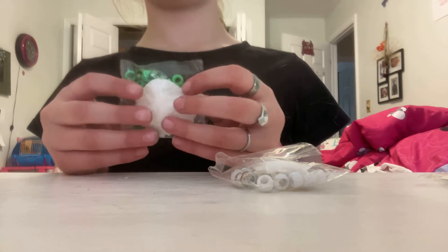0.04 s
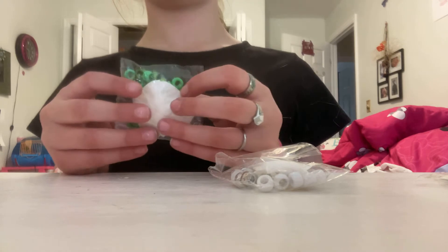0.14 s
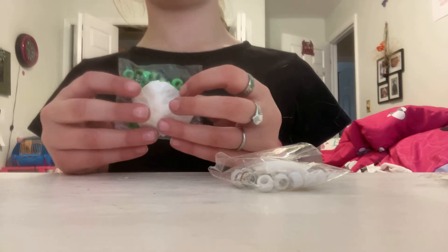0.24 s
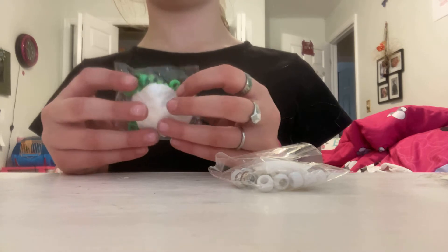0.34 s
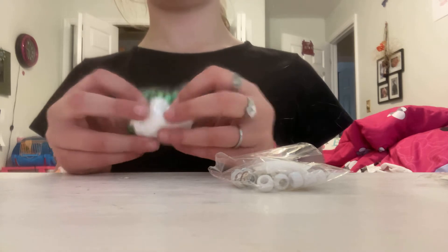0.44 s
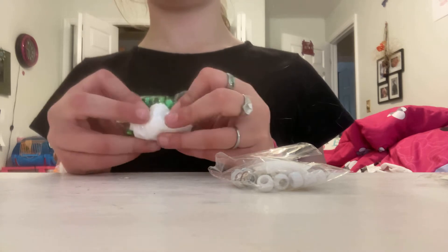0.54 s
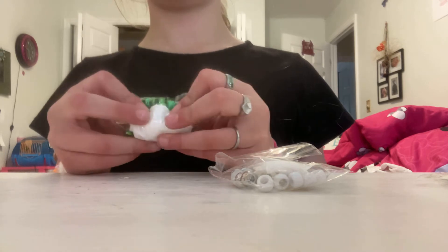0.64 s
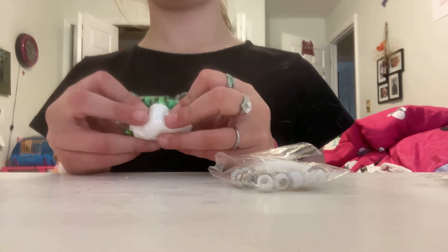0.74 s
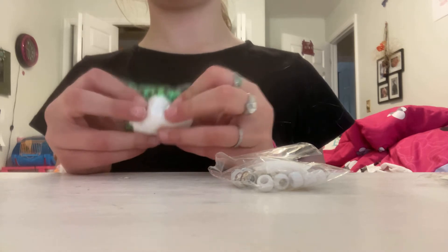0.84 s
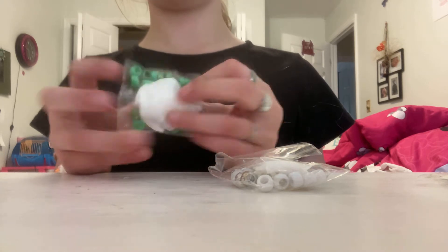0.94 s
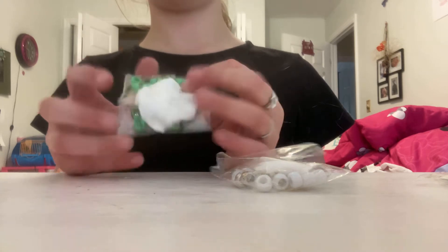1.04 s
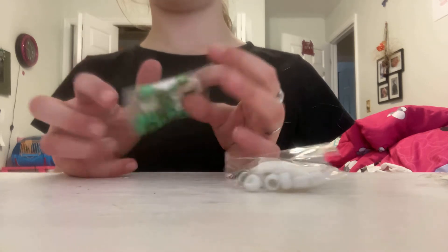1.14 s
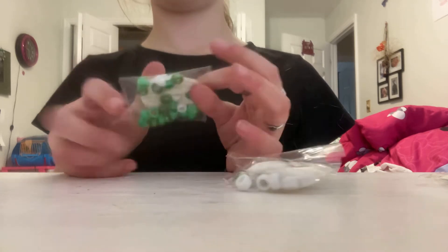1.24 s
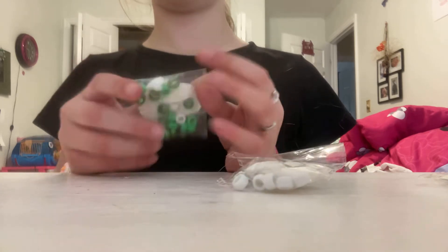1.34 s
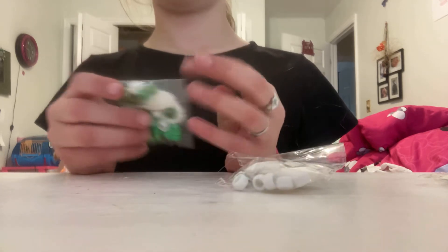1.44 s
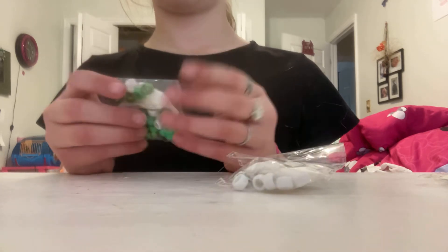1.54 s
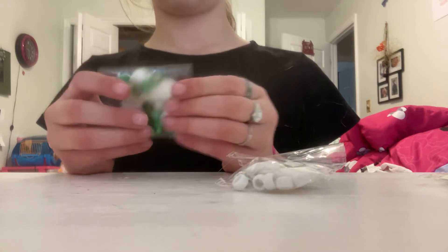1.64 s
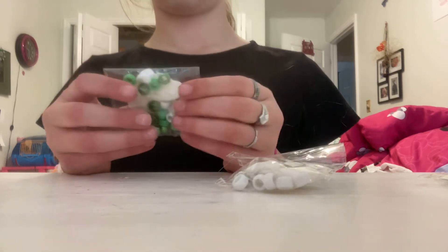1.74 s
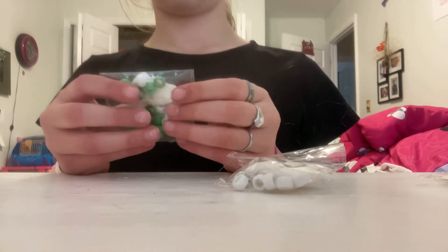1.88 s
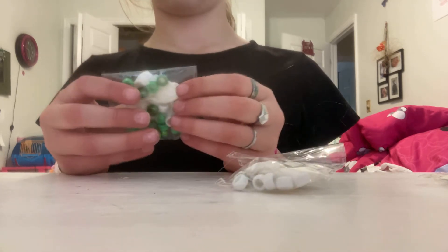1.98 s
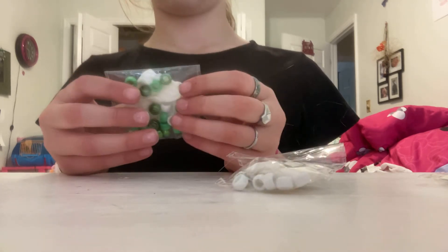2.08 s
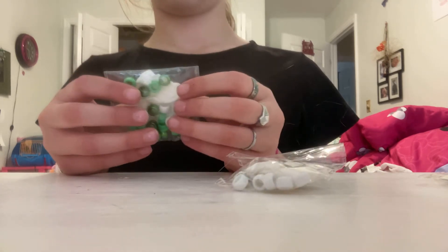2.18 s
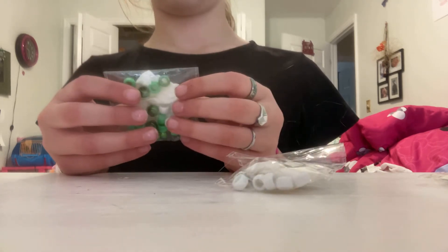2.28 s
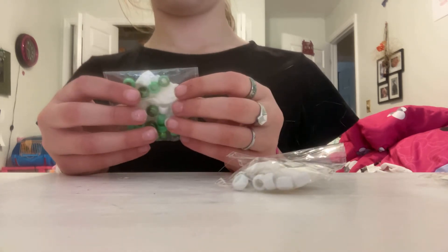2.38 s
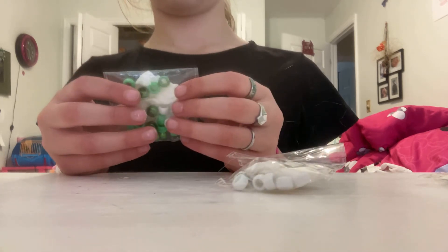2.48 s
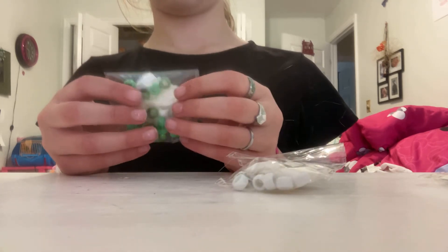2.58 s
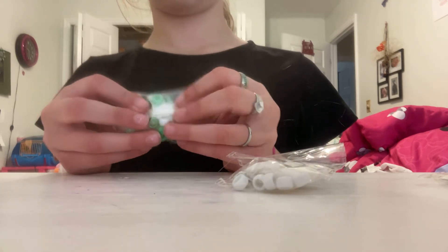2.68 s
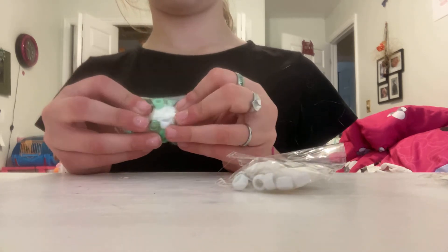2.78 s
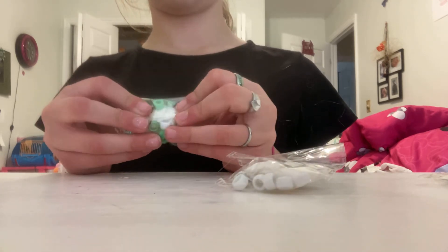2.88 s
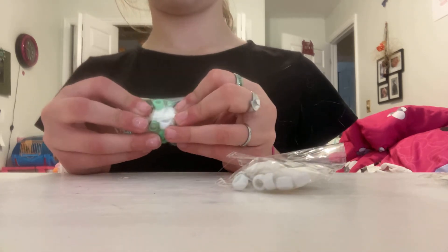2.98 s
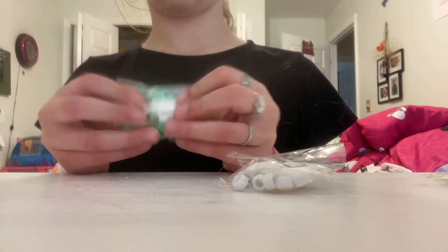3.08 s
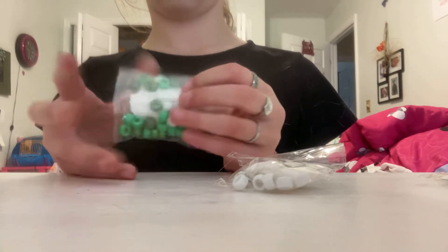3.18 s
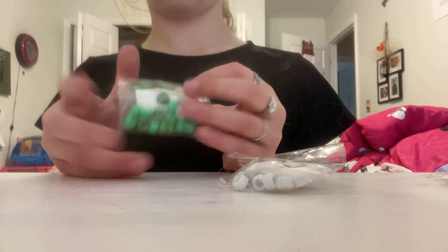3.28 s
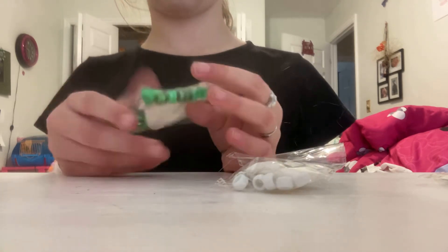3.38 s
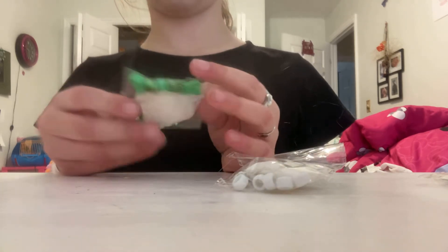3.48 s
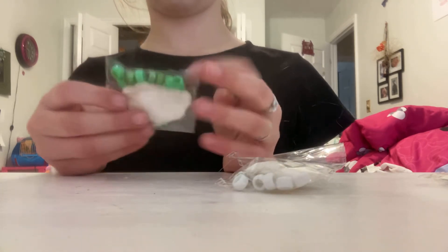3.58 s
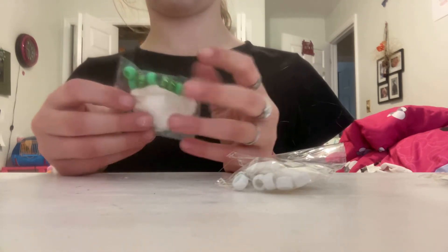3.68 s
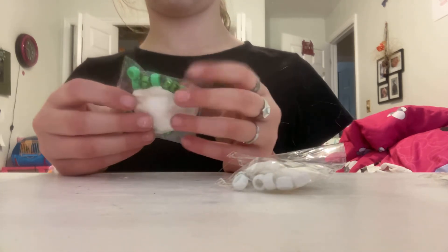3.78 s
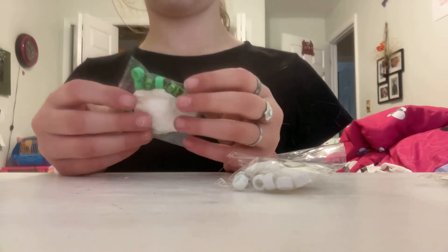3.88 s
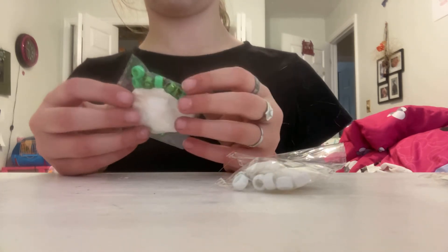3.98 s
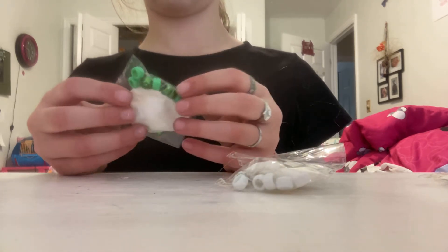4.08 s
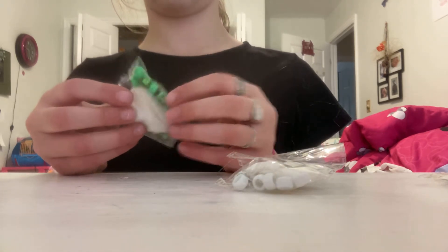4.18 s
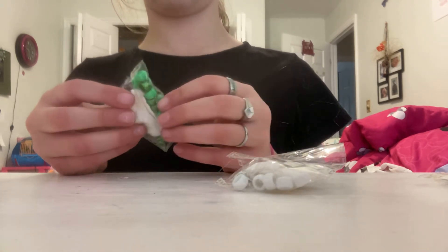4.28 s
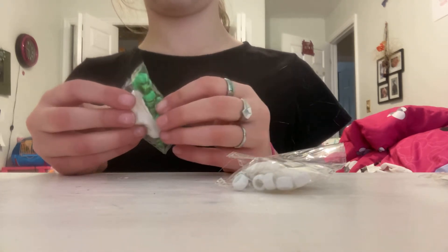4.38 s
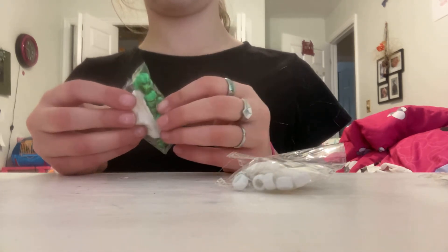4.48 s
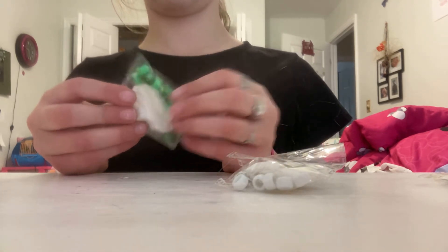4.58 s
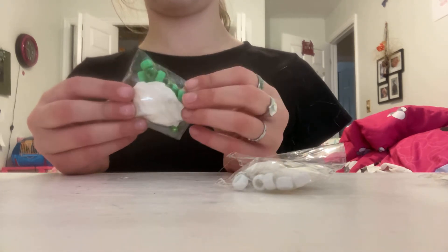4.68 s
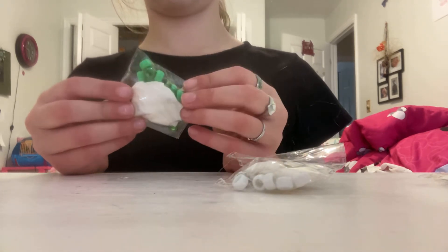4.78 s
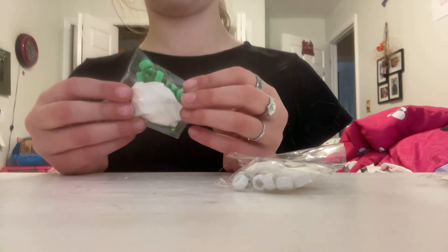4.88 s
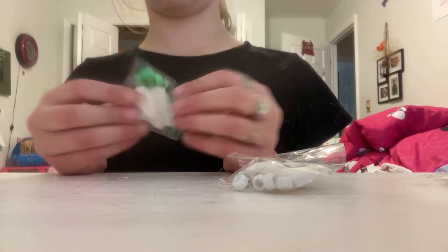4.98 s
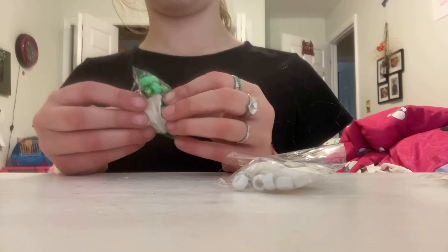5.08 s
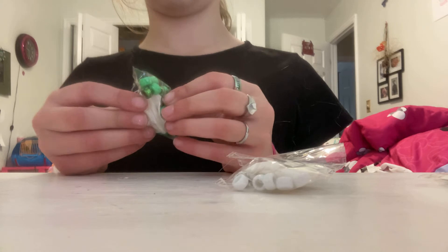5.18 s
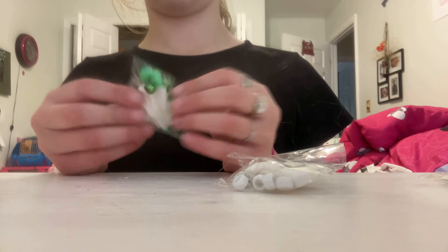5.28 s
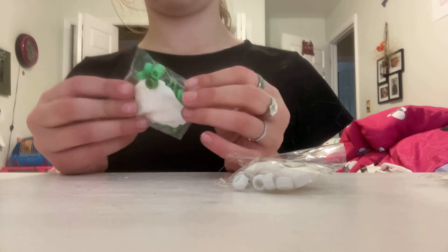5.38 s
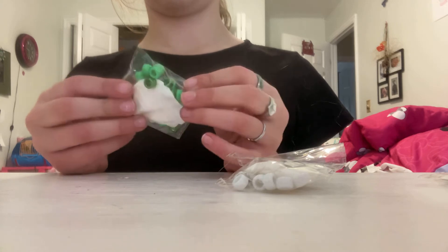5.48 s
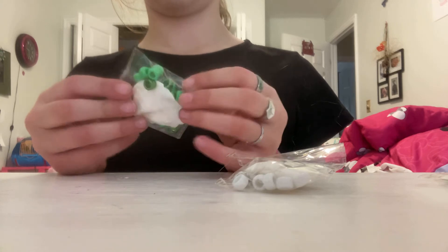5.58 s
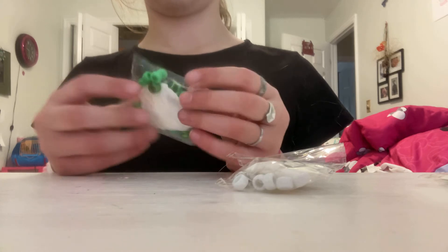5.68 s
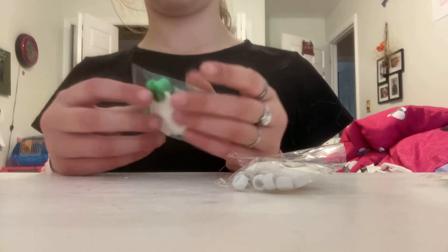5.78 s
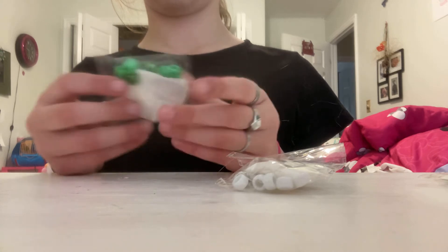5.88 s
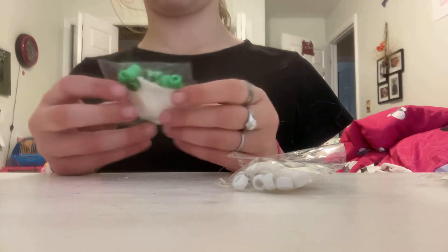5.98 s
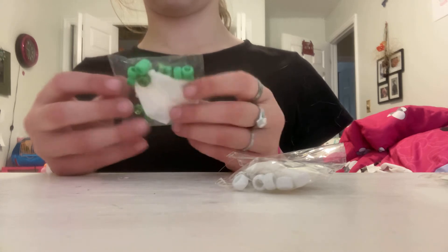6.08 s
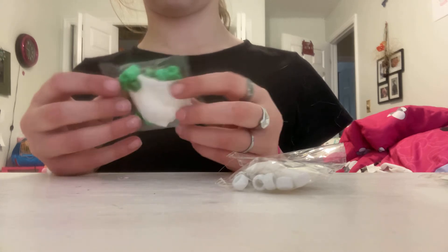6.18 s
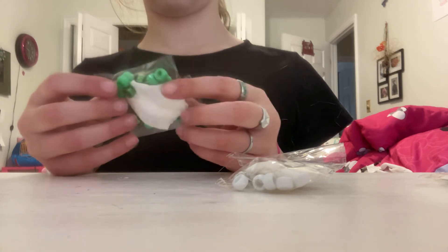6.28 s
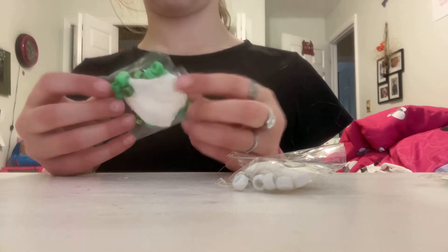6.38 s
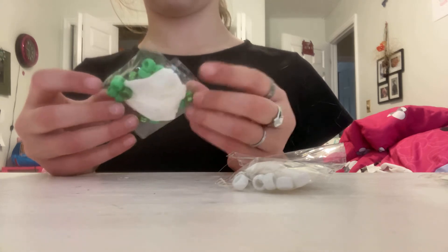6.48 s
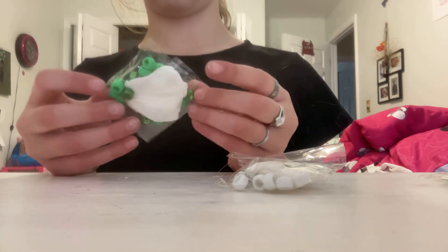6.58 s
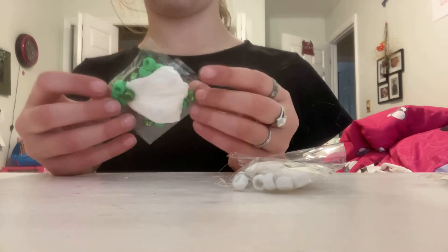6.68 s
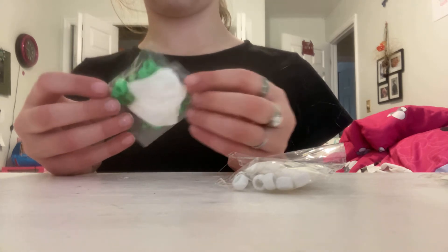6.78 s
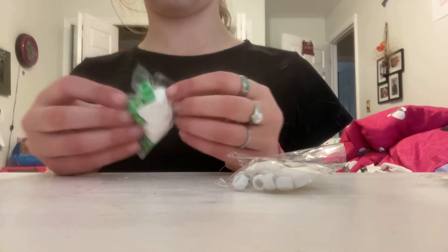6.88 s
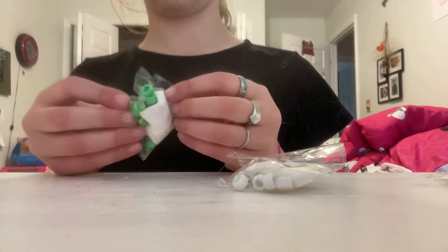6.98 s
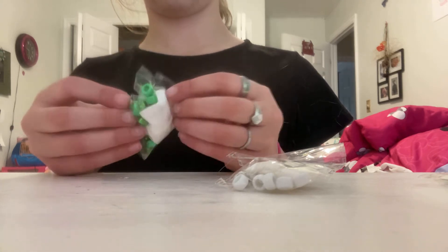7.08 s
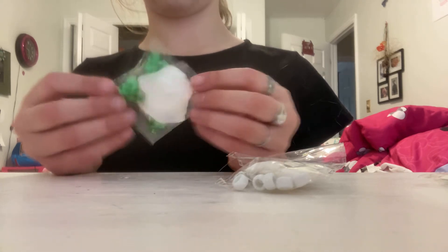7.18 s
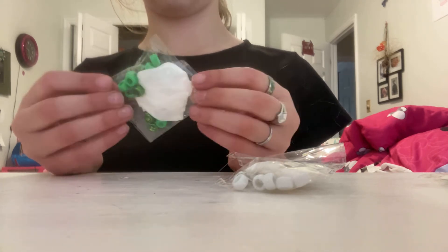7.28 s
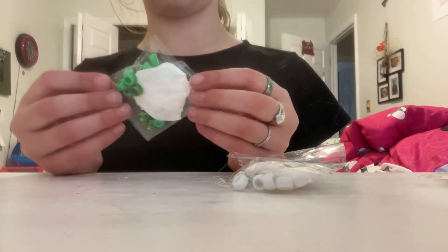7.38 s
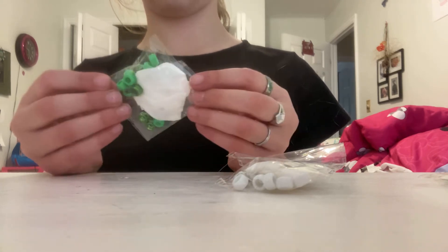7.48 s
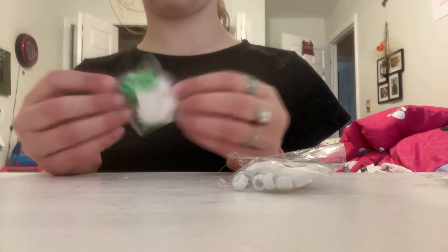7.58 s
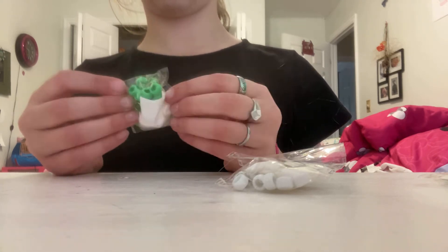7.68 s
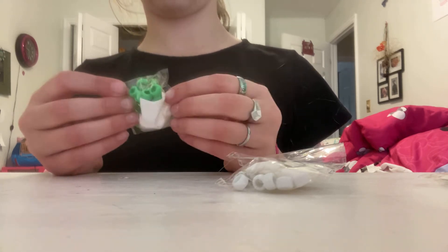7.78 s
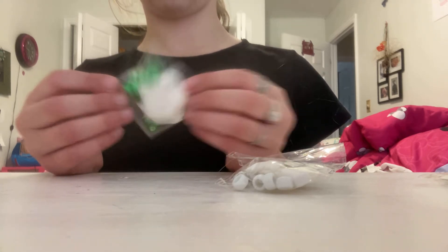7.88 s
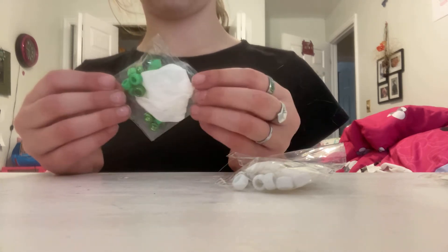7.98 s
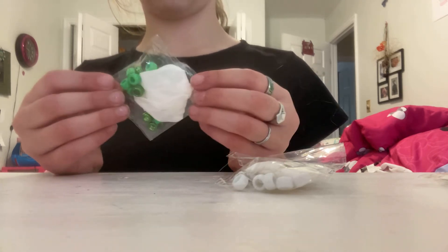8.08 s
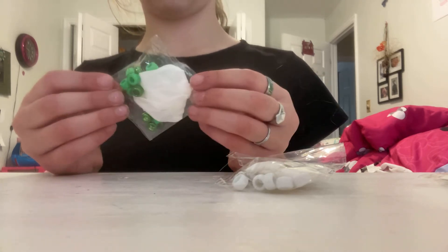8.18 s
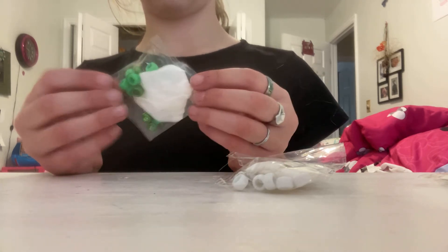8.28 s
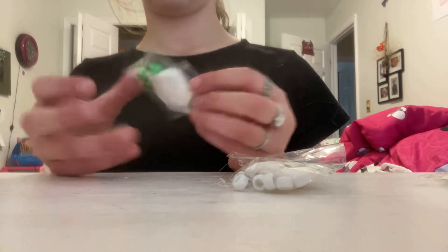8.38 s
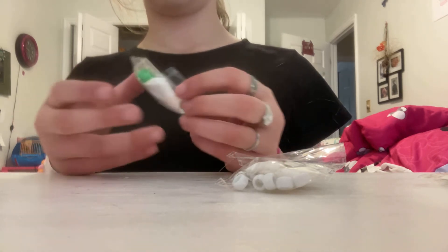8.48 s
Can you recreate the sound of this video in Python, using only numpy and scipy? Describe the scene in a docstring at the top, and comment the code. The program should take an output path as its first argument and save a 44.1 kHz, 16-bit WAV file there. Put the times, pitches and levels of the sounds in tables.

```python
"""A small plastic bag of beads and paper, squeezed and folded by two hands, close up at a table.
Each squeeze or change of grip builds up, holds and lets go; its strain drives a crackle of creases
and a soft rubbing. Large creases buckle in single snaps, the packed bag adds a hollow body, and
fingertips land with a few dull bumps. The table and a small furnished room answer faintly over a
low hum."""
import sys
import numpy as np
from scipy import signal
from scipy.fft import rfft, irfft
from scipy.io import wavfile
from scipy.ndimage import uniform_filter1d

SR = 44100
rng = np.random.default_rng(int(sys.argv[2]) if len(sys.argv) > 2 else 0)


def log_audio(samples):
    """Write samples as a 16-bit WAV file to the path given in sys.argv[1]."""
    # one column per channel
    frames = np.atleast_2d(samples).T
    # limit to full scale, then quantise
    limited = np.clip(frames, -1, 1)
    pcm = np.round(limited * 32767).astype(np.int16)
    wavfile.write(sys.argv[1], SR, pcm)


N = 376658

# hollow colour of the packed bag: f/Hz, level/dB
BODY_COLOUR = [(100, -29), (260, -18), (400, -16), (560, -5), (680, -6.5), (790, -5.5), (890, 0.5),
               (1060, -3.5), (1400, -5), (1800, -14), (2500, -19.5), (5000, -54)]
# bright colour of the ringing film: f/Hz, level/dB
FILM_COLOUR = [(400, -71), (1500, -9), (2350, -8.5), (2750, -2), (3700, 0), (5300, 0), (6500, -1),
               (8000, -18), (12000, -6)]
TAPS = 512  # samples in one snap
SNAP_TIME, SNAP_HZ = np.arange(TAPS) / SR, np.fft.rfftfreq(TAPS, 1 / SR)
TIME = np.arange(N) / SR


def snaps(body_db=-0.1, ring_db=1.76, edge_db=0.4, facet_hz=3746, hollow_db_per_octave=65.5):
    """Large creases buckle one at a time; a broad facet rings lower and pushes more air."""
    # t/s, level/dB over 1 ms, hollow body/dB, crisp edge/dB (both relative to level; all before trims)
    large_creases = [(0.0367, -52, -27, 17.5), (0.0616, -19, -10.5, -9), (0.0834, -27.5, -9, -9),
                     (0.1017, -40.5, 9, -7), (0.128, -36, -14, -4), (0.3758, -16, -7.5, -22),
                     (0.4597, -15.5, -32, -8), (0.5982, -26, -39, 3), (0.7061, -39.5, -12, 4),
                     (0.788, -31, -60, -5), (0.821, -21, -7, -23), (0.8541, -26, -19, 8.5),
                     (0.872, -29, -24, 7), (0.998, -18, -7, -4), (1.0523, -23, -14, 4),
                     (1.1997, -30, -23, -9), (1.289, -25.5, -37, -6), (1.3107, -25.5, -5, -6),
                     (1.389, -18.5, -36, -21), (1.4087, -19.5, -14, -1.5), (1.4408, -21, -13, -10),
                     (1.4718, -24.5, -21, 4), (1.4961, -21, -34, -6), (1.5513, -26.5, -5.5, -18),
                     (1.6881, -33, 4.5, -1), (1.72, -31.5, -2, -17), (1.7704, -30, -4, -14),
                     (1.979, -22, -10, -7), (1.9853, -21.5, -24, -3), (2.1, -39, -1, 7.5),
                     (2.163, -42.5, -13, -11), (2.289, -37, -3.5, -6), (2.54, -25, 2, 1),
                     (2.5586, -23, -5, -3), (2.5938, -23, -0.5, 5), (2.639, -23, -22, 1),
                     (2.6451, -18, -2.5, 5), (2.6824, -22, -11, 6), (2.703, -19.5, -12, -18),
                     (2.86, -31, -31, -9), (2.8767, -28.5, -13, -1), (2.922, -31.5, -50, 6.5),
                     (3.046, -25, -15, 3), (3.069, -24.5, -3, 11), (3.0851, -20, 3.5, 6),
                     (3.0956, -13, -4, -6), (3.1768, -26.5, -32, -4), (3.348, -22.5, -14, -4.5),
                     (3.4102, -29.5, -8, -2), (3.5254, -25, -10, -14), (3.548, -24.5, -32, -6),
                     (3.722, -28.5, -9, -8), (3.7346, -25.5, -0.5, -4.5), (3.878, -30.5, -18, -20.5),
                     (3.9593, -37, -5, 7.5), (4.0451, -26.5, -11, -5), (4.1087, -19.5, -7, 5),
                     (4.1669, -12.5, 0, -1.5), (4.2546, -18, -5.5, -7), (4.2664, -20.5, -10, -7),
                     (4.2735, -31, -6, 12.5), (4.3174, -23.5, -9, -0.5), (4.6051, -16, -6, -1),
                     (4.6288, -19, 3.5, 4), (4.7068, -15, -31, -8.5), (4.9547, -12, -18, -6),
                     (4.9788, -14, 0.5, -7), (4.9946, -10.5, -16, 0), (5.0911, -24.5, -25, -7.5),
                     (5.238, -40.5, -10, 4), (5.2758, -32, -11, 3), (5.383, -16, -5.5, -10),
                     (5.4954, -28.5, -1.5, -11), (5.658, -18.5, -18, -6), (5.7013, -19, -11, -5),
                     (5.7433, -25, 6, 5.5), (5.804, -26, -14, 2), (5.8184, -23, -29, -3),
                     (5.863, -17.5, -13, -11), (5.972, -27, -10, -0.5), (6.045, -24, -7, -16),
                     (6.1938, -18, -10, 1), (6.2305, -22, -16, -12), (6.2573, -25, -16, -9),
                     (6.3074, -22.5, -11, -11), (6.321, -14.5, -14.5, -18), (6.345, -22.5, -7, -12),
                     (6.4364, -23, -10, -0.5), (6.4482, -20.5, -8, -10), (6.4766, -24, -6, -5),
                     (6.5412, -28, -19, -4), (6.575, -28, -3, -27), (6.6072, -29, -3.5, -13),
                     (6.6706, -25.5, -5, -11), (6.7269, -28, -13, 0.5), (6.8188, -13, -8.5, -2.5),
                     (6.889, -12.5, -33, -10), (6.9086, -19.5, -18, -4), (6.9782, -32, -11, 2),
                     (7.1044, -16.5, -12.5, -6), (7.1367, -15.5, -11, -1), (7.1841, -9, -7.5, -26),
                     (7.2659, -21.5, -5, -10), (7.317, -23.5, 0.5, -2), (7.3407, -16, -3, -11),
                     (7.4184, -37.5, -4, 6), (7.5819, -11.5, -9.5, -28), (7.608, -14, -18, -12),
                     (7.6245, -14, -9.5, -3), (7.7582, -30.5, -22.5, -1.5), (7.8511, -14.5, -32, -3),
                     (7.9, -11, -1.5, -7), (7.9378, -17.5, -4, -4.5), (8.1542, -34.5, -8.5, -22),
                     (8.2839, -24.5, 0, -7), (8.2946, -19, -1.5, -3.5), (8.331, -27, -6, -10),
                     (8.4348, -24.5, -1.5, -0.5)]
    times, level, hollow, crisp = np.transpose(large_creases)
    ring_hz = facet_hz * 2 ** (-hollow / hollow_db_per_octave)
    body, ring, edge = creases(ring_hz, width_hz=1410, tilt_db=3.5)
    sounds = amp(hollow + body_db)[:, None] * body + amp(ring_db) * ring
    sounds += amp(crisp + edge_db)[:, None] * edge
    sounds *= amp(level)[:, None] * np.sqrt(SR / 1000)
    out = np.zeros(N)
    for s, sound in zip(times, sounds):
        add(out, s, sound)
    return out


def crackle(full_per_s=2300, full_db=-23.5, db_per_decade=23.0, size_spread_db=9.5,
            body_db=-5, edge_db=-5, edge_follow=0.15, colour_spread_db=3.5, variants=96):
    """Small creases: the harder the squeeze, the more of them flip and the larger and crisper they are."""
    strain_db, hollow_db = hand_strain()
    flips_per_s = full_per_s * 10 ** (np.minimum(strain_db - full_db, 0) / db_per_decade)
    at = np.flatnonzero(rng.random(N) < flips_per_s / SR)
    size_draw, body_draw, edge_draw = rng.standard_normal((N, 3))[at].T
    size = amp(size_spread_db * np.minimum(size_draw, 2))
    # neighbouring creases share the strain that the fingers put in
    energy = np.zeros(N)
    energy[at] = size ** 2
    expected_energy = np.mean(size ** 2) * flips_per_s / SR
    shared_energy = .9 * uniform_filter1d(energy, size=1000) + .1 * expected_energy
    size *= amp(strain_db[at]) / np.sqrt(shared_energy[at])
    size *= rng.choice([-1, 1], N)[at]  # a crease flips inwards or outwards
    body, ring, edge = creases(ring_hz=4350 * np.exp(0.19 * rng.standard_normal(variants)))
    kind = rng.integers(0, variants, N)[at]
    body_gain = amp(hollow_db[at] + body_db + colour_spread_db * body_draw)
    edge_gain = amp(edge_db + edge_follow * (strain_db[at] - full_db) + colour_spread_db * edge_draw)
    sounds = ring[kind] + body_gain[:, None] * body[kind] + edge_gain[:, None] * edge[kind]
    out = np.zeros(N)
    for index, sound in zip(at, size[:, None] * sounds):
        add(out, index / SR, sound)
    return out


def creases(ring_hz, width_hz=1500, tilt_db=4.0, body_spread=0.073):
    """Body, ring and edge of one crease per pitch; each facet has its own resonance and sharpness."""
    # colour of a snap's sharp edge: f/Hz, level/dB
    edge_colour = [(700, -40), (2000, -33), (5500, -3), (7400, 3), (11400, 0), (15500, 0.8), (18400, -76)]
    count = len(ring_hz)
    tilt_draw, pocket_draw = rng.standard_normal((2, count, 1))
    facet_db = -10 * np.log10(1 + (2 * (SNAP_HZ - ring_hz[:, None]) / width_hz) ** 2)
    slope_db = tilt_db * tilt_draw * np.log2(1 + SNAP_HZ / ring_hz[:, None])
    pocket_size = np.exp(body_spread * pocket_draw)  # the air pocket changes with the grip
    body = buckle(curve(BODY_COLOUR, SNAP_HZ * pocket_size), count, flutter=1.35, flutter_s=.0018)
    ring = buckle(curve(FILM_COLOUR, SNAP_HZ) + facet_db, count, flutter=1.5, flutter_s=.0008)
    edge = buckle(curve(edge_colour, SNAP_HZ) + slope_db, count, flutter=1.2, flutter_s=.0007)
    return body, ring, edge


def buckle(colour_db, count, flutter, flutter_s):
    """Creases flip: one kick each, then a short random flutter of the sheet."""
    kick = flutter * unit(rng.standard_normal((count, TAPS)) * np.exp(-SNAP_TIME / flutter_s))
    kick[:, 0] += 1
    return unit(irfft(rfft(kick) * pulse_spectrum(colour_db)))


def hand_strain(squeeze_release_s=0.088, grip_attack_s=0.051, grip_release_s=0.072,
                rest_db=-66.5, rest_hollow_db=6.5):
    """Squeezes and grips add up to the strain on the film and set how hollow it sounds, both in dB."""
    # the hands bear down: t/s at full force, attack/s, hold/s, level/dB, hollowness/dB
    squeezes = [(0.355, 0.019, 0.097, -27, -2), (0.857, .11, 0.033, -29.5, -2),
                (2.591, 0.046, 0.042, -26.5, -6.5), (3.081, 0.088, .01, -25.5, -3.5),
                (4.167, 0.2, 0.012, -27, 0), (4.602, 0.11, 0.027, -23, -2),
                (4.957, 0.078, 0.037, -25.5, -1), (5.313, .075, 0.014, -20.5, 0),
                (6.776, 0.045, .1, -27, -3), (7.162, 0.074, 0.028, -24.5, -1),
                (7.539, 0.051, 0.042, -25.5, 0), (7.898, 0.15, 0.011, -26, -1.5)]
    # the fingers shift and turn the bag: t/s at full force, hold/s, level/dB, hollowness/dB
    grips = [(0.085, .04, -47, -1), (0.212, 0.011, -50, 5.5), (0.486, 0.057, -41, -12.5),
             (0.586, 0.037, -46, -4.5), (0.948, 0.026, -31, -5.5), (1.082, 0.062, -37, -5),
             (1.215, 0.084, -40.5, 1), (1.369, 0.025, -32, -1), (1.448, 0.042, -42, 3),
             (1.532, 0.14, -51.5, 2.5), (1.784, 0.026, -52, 5.5), (1.947, 0.04, -38, -2.5),
             (2.131, 0.036, -57, 5), (2.474, 0.027, -53, 4), (2.724, 0.048, -36.5, -11),
             (2.902, 0.023, -52, 2), (3.153, 0.11, -44, 0), (3.337, 0.018, -30.5, -1),
             (3.396, 0.026, -43.5, 2), (3.474, 0.15, -41, 3), (3.754, 0.046, -50, 2),
             (4.068, 0.022, -34, -6.5), (4.269, 0.034, -35.5, -11), (4.339, 0.051, -41.5, -11),
             (4.525, .015, -33, -6.5), (4.665, 0.036, -42, 3), (5.587, .11, -33.5, 0.5),
             (5.727, 0.16, -44, 2.5), (5.965, 0.068, -42, 3), (6.104, 0.0073, -29, 1),
             (6.153, 0.205, -48.5, 5), (6.377, 0.24, -48, 1.5), (6.706, 0.015, -44, -3.5),
             (6.936, .06, -47.5, 4), (7.213, 0.044, -33, 1.5), (7.344, 0.004, -35, -3),
             (7.616, 0.03, -36.5, -2), (7.98, 0.035, -43.5, 6), (8.285, 0.071, -37, -1.5),
             (8.369, 0.09, -43, 3), (8.516, .01, -53.5, 4)]
    moves = [(s, attack, hold, squeeze_release_s, db, hollow) for s, attack, hold, db, hollow in squeezes]
    moves += [(s, grip_attack_s, hold, grip_release_s, db, hollow) for s, hold, db, hollow in grips]
    strain = amp(rest_db) ** 2  # the bag merely held
    weighted_hollow = strain * rest_hollow_db
    for *shape, hollow in moves:
        power = stroke(*shape)
        strain += power
        weighted_hollow += hollow * power
    return 10 * np.log10(strain), weighted_hollow / strain


def stroke(s, attack_s, hold_s, release_s, db, range_db=30):
    """Power of one hand movement: it swells by range_db over the attack, holds and lets go."""
    away = np.maximum(s - TIME, 0) / attack_s + np.maximum(TIME - s - hold_s, 0) / release_s
    return amp(db - range_db * np.minimum(away, 4)) ** 2


def rubbing(body_db=-59, film_db=-56, body_follow=0.77, film_follow=0.78, hollow_share=0.86,
            grain_db=11.0, slips_per_s=2500, light_touch_db=-42):
    """Paper and fingers slide on the film: tiny dense slips sound body and film, louder with pressure."""
    strain_db, hollow_db = hand_strain()
    press_db = strain_db - light_touch_db
    layers = [(BODY_COLOUR, body_db + body_follow * press_db + hollow_share * hollow_db),
              (FILM_COLOUR, film_db + film_follow * press_db)]
    out = np.zeros(N)
    for colour, db in layers:
        slips = (rng.random(N) < slips_per_s / SR) * rng.choice([-1, 1], N)
        sizes = amp(grain_db * np.minimum(rng.standard_normal(N), 2.5))
        friction = unit(slips * sizes) * np.sqrt(N) * amp(db)
        tick = unit(irfft(pulse_spectrum(curve(colour, SNAP_HZ))))
        out += signal.oaconvolve(friction, tick)[:N]
    return out


def finger_bumps(band_hz=(90, 330), decay_s=.025):
    """Fingertips land on the bag with a short dull push."""
    # soft landings: t/s, peak level/dB
    landings = [(0.877, -39), (4.163, -50), (4.27, -35), (4.627, -42), (8.436, -30.5)]
    t, out = np.arange(SR // 10) / SR, np.zeros(N)
    dull = signal.butter(2, band_hz, "band", fs=SR, output="sos")
    for s, db in landings:
        push = signal.sosfilt(dull, rng.standard_normal(len(t)) * np.exp(-t / decay_s))
        add(out, s, amp(db) * push / abs(push).max())
    return out


def room(x, near_db=-16, near_s=.003, tail_db=-18.5, echoes_per_s=4000):
    """Quick scatter from table, hands and chest, then the soft tail of the room."""
    # reverb time of the room: f/Hz, T60/s
    reverb_times = [(200, 0.23), (1000, 0.32), (4000, 0.17), (8000, 0.29), (16000, 0.29)]
    t = np.arange(SR // 2) / SR
    scatter, walls = rng.standard_normal((2, len(t))) * (rng.random((2, len(t))) < echoes_per_s / SR)
    near = unit(scatter * (t > .0015) * np.exp(-t / near_s))
    hz, frame_s, bands = signal.stft(walls * (t > .006), SR, nperseg=256)
    bands *= 1000 ** (-frame_s / curve(reverb_times, hz)[:, None])
    tail = unit(signal.istft(bands, SR, nperseg=256)[1][:len(t)])
    return signal.fftconvolve(x, amp(near_db) * near + amp(tail_db) * tail)[:N]


def room_tone():
    """Low rush of air with a few narrow drones, as of a fan."""
    # broad bed of air: f/Hz, level/dB per Hz
    air = [(20, -106), (40, -101), (56, -79), (100, -76), (160, -81.5), (220, -83), (400, -89.5),
           (600, -90.5), (950, -94.5), (1500, -99), (2200, -107), (4500, -107), (8000, -112), (16000, -117)]
    # drones: f/Hz, width/Hz, level/dB per Hz
    hum = [(81, 20, -83), (134.6, 12, -70), (190, 25, -80), (258.6, 19.4, -74.5), (340.4, 31, -76.5),
           (455, 30, -80)]
    hz = np.fft.rfftfreq(N, 1 / SR)
    drones = sum(amp(db) ** 2 * np.exp(-(2 * (hz - centre) / width) ** 2) for centre, width, db in hum)
    density = amp(curve(air, hz)) ** 2 + drones
    return irfft(rfft(rng.standard_normal(N)) * np.sqrt(density * SR / 2), N)


def pulse_spectrum(colour_db):
    """Spectrum of the sharpest (minimum-phase) pulse that has this colour."""
    log_gain = np.maximum(colour_db, -80) * np.log(10) / 20
    cepstrum = irfft(log_gain)
    cepstrum[..., 1:TAPS // 2] *= 2
    cepstrum[..., TAPS // 2 + 1:] = 0
    return np.exp(rfft(cepstrum))


def amp(db):
    """Decibels to gain."""
    return 10 ** (np.asarray(db) / 20)


def unit(x):
    """Scales each row to energy 1."""
    return x / np.sqrt(np.sum(x ** 2, -1, keepdims=True) + 1e-20)


def curve(points, hz):
    """Reads a table on a log-frequency axis."""
    f, value = np.transpose(points)
    return np.interp(np.log(hz + 1), np.log(f), value)


def add(mix, s, sound):
    """Mixes a sound in at time s."""
    part = mix[max(round(s * SR), 0):][:len(sound)]
    part += sound[:len(part)]


def scene(low_cut_hz=230):
    """The bag in its room; the snaps, crackle and rubbing carry little bass below about 230 Hz."""
    low_cut = signal.butter(3, low_cut_hz, "high", fs=SR, output="sos")
    film = signal.sosfilt(low_cut, snaps() + crackle() + rubbing())
    bag = film + finger_bumps()
    return (bag + room(bag) + room_tone())[None]


def record(dry, ceiling=0.9, high_cut_hz=16300):
    """The microphone rounds off the very loudest snaps; a high cut trims the top."""
    rounded = ceiling * np.tanh(dry / ceiling)
    high_cut = signal.firwin(255, high_cut_hz, window=("kaiser", 9), fs=SR)
    return signal.oaconvolve(rounded, high_cut[None], "same")


dry = scene()
out = record(dry)
log_audio(out)
```